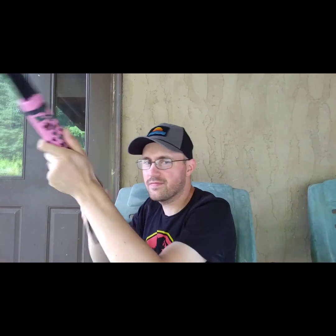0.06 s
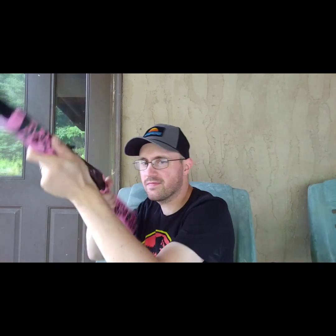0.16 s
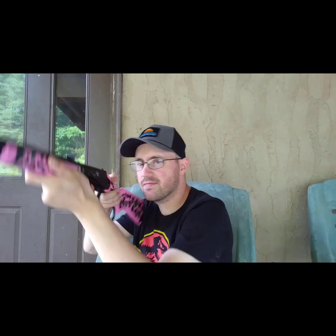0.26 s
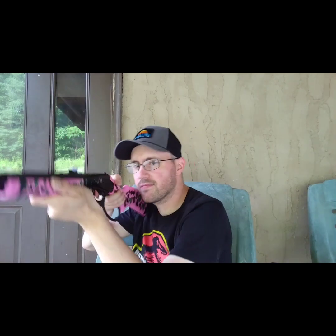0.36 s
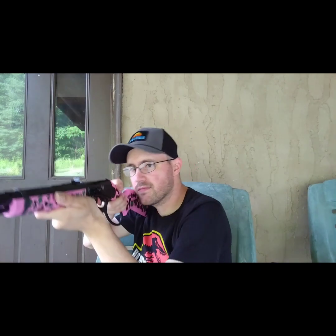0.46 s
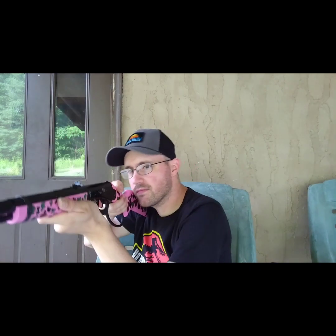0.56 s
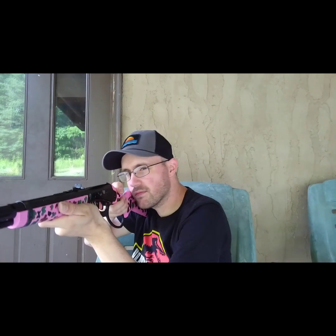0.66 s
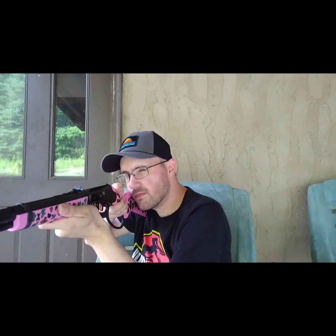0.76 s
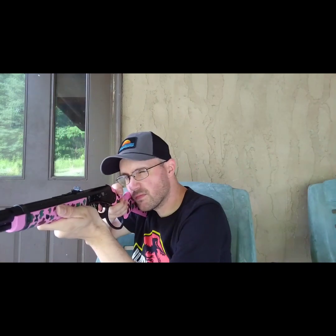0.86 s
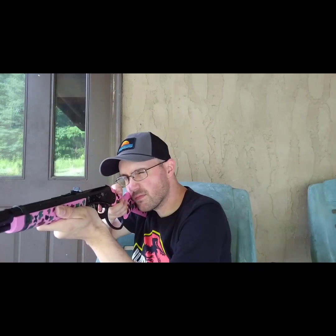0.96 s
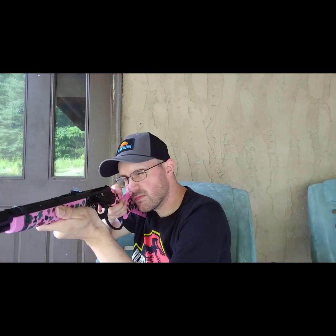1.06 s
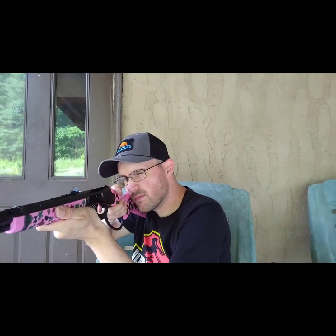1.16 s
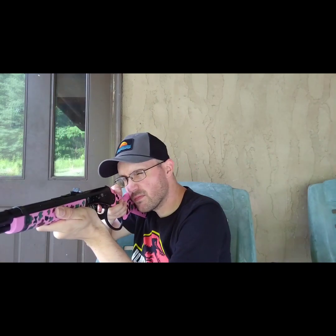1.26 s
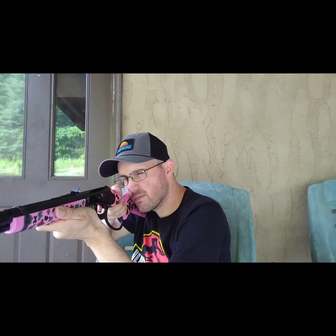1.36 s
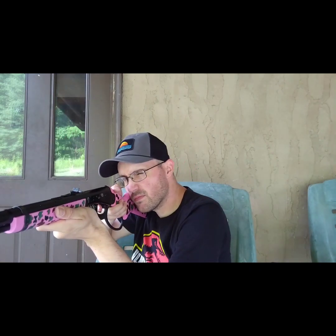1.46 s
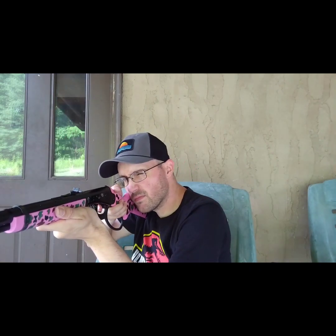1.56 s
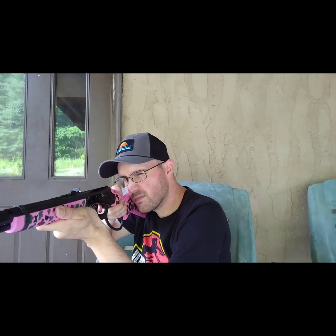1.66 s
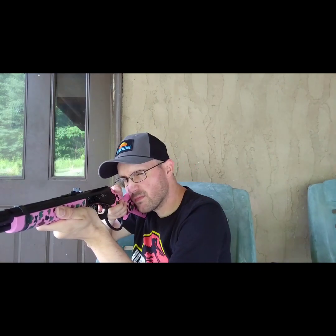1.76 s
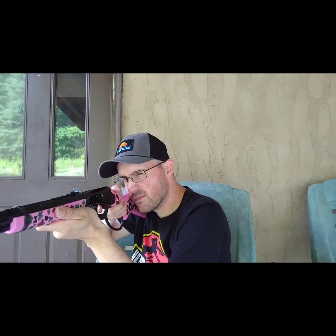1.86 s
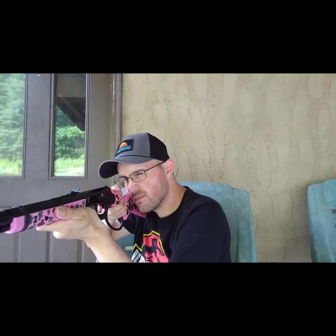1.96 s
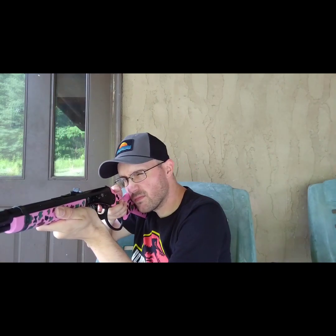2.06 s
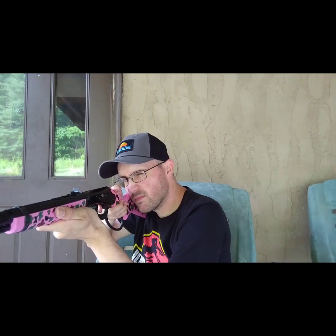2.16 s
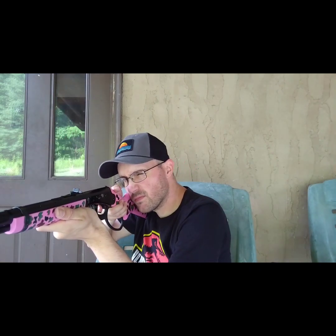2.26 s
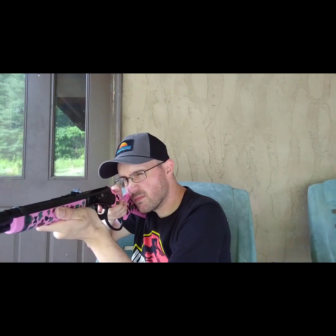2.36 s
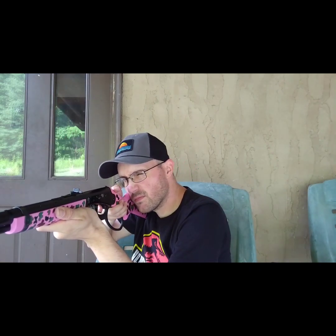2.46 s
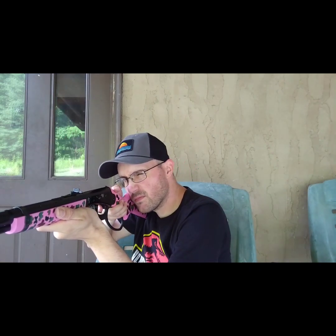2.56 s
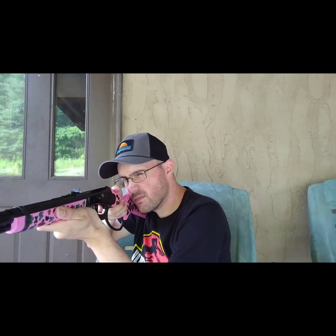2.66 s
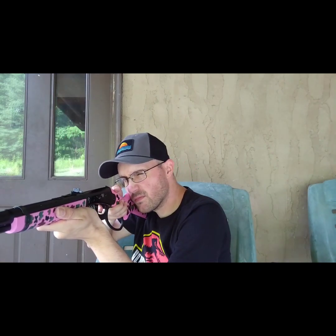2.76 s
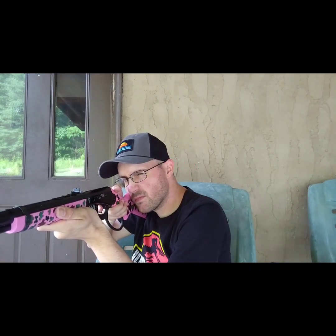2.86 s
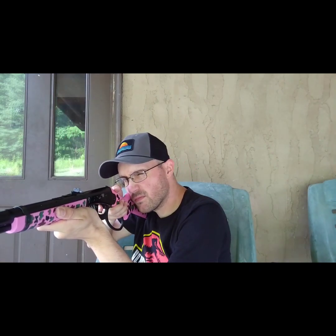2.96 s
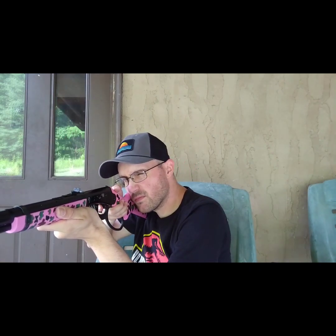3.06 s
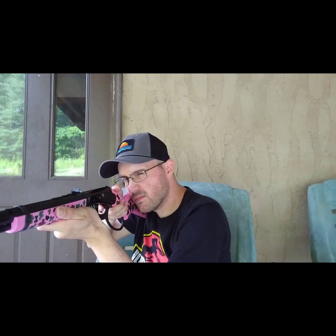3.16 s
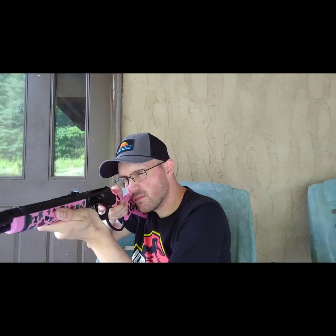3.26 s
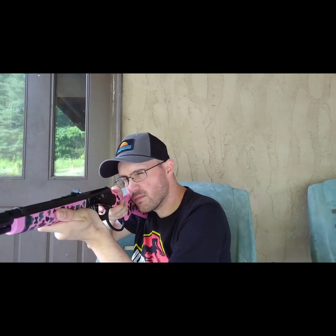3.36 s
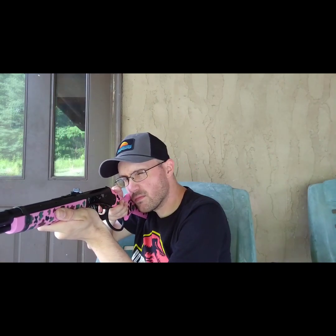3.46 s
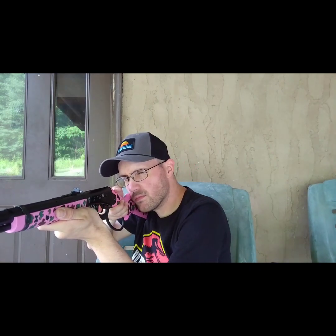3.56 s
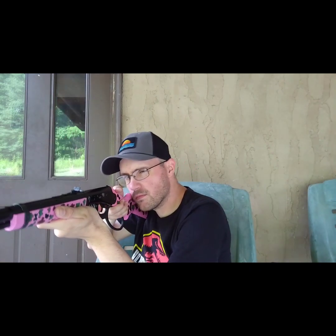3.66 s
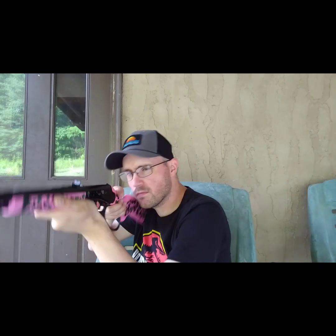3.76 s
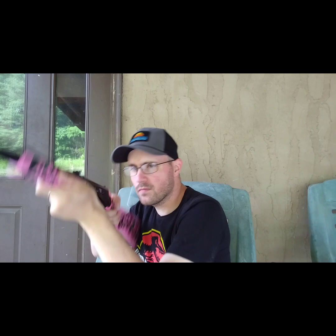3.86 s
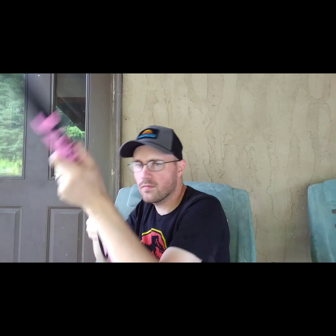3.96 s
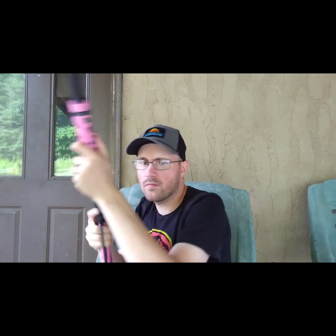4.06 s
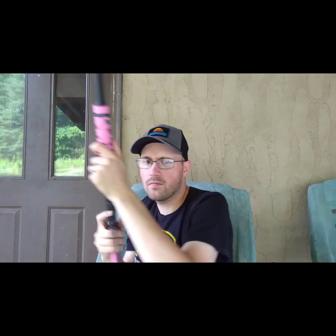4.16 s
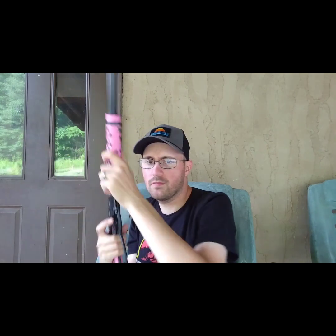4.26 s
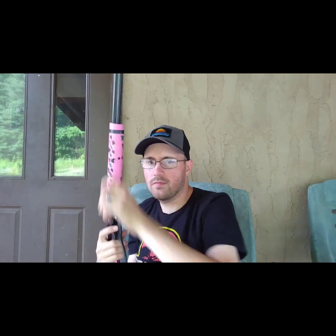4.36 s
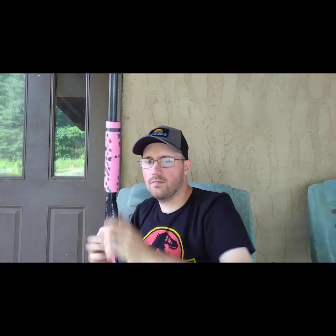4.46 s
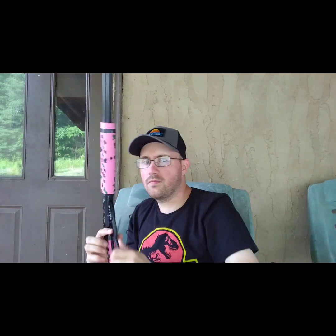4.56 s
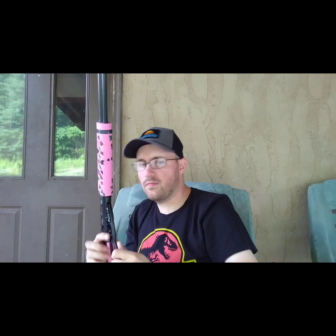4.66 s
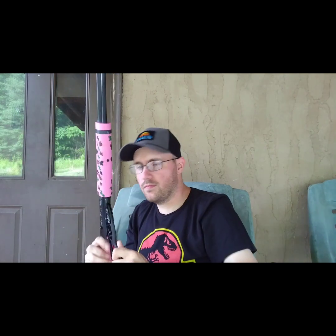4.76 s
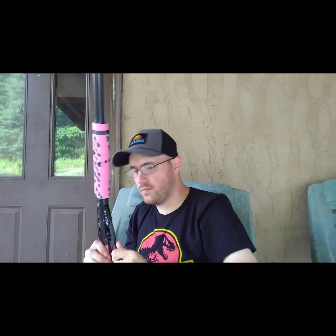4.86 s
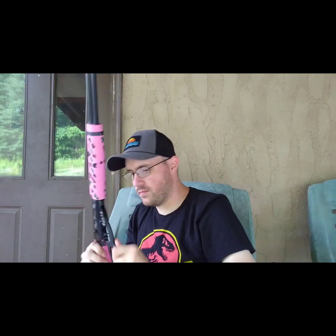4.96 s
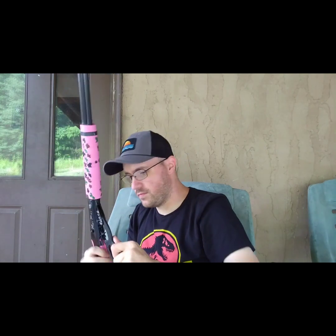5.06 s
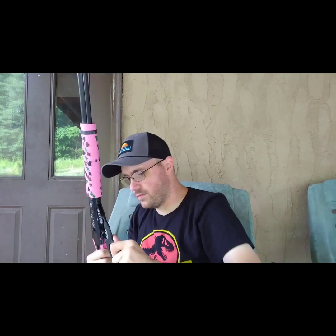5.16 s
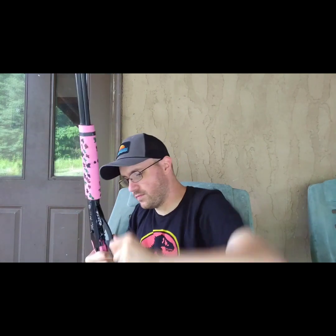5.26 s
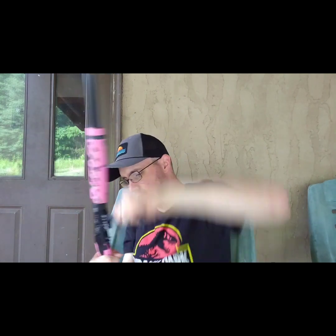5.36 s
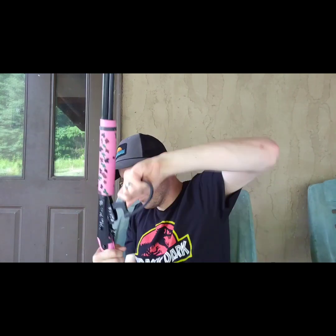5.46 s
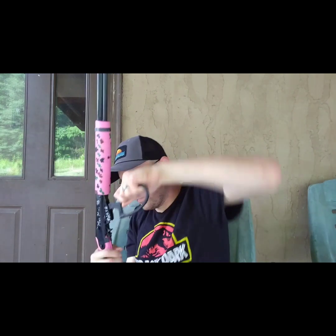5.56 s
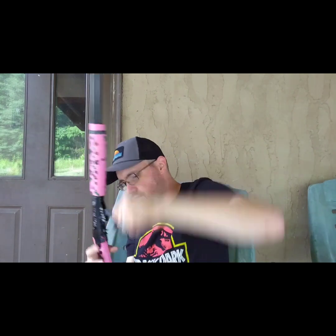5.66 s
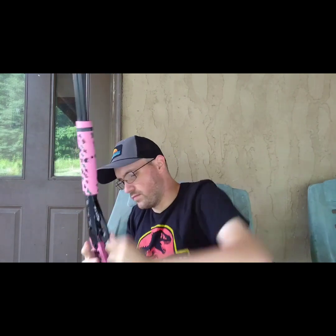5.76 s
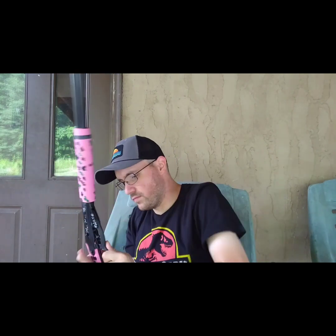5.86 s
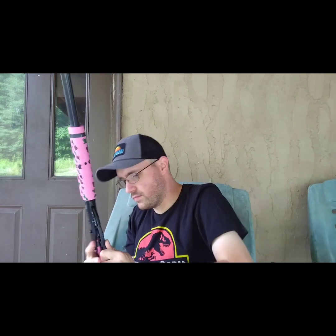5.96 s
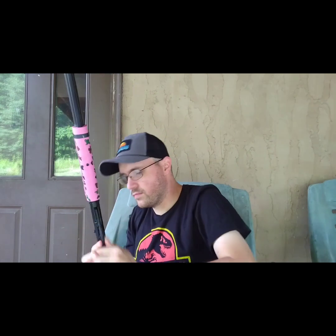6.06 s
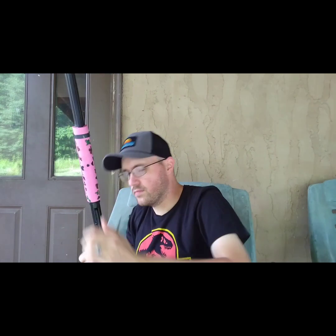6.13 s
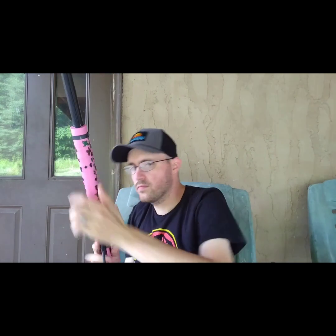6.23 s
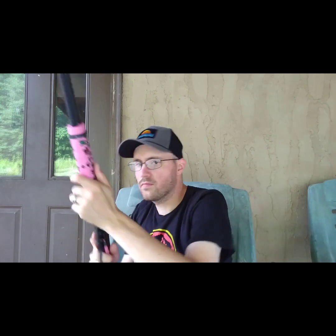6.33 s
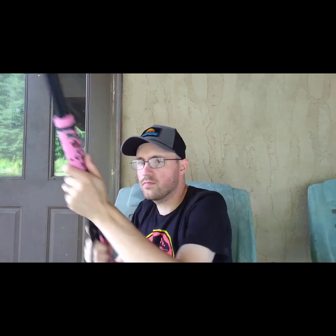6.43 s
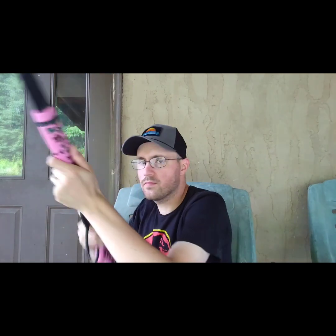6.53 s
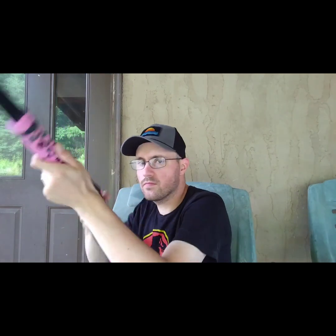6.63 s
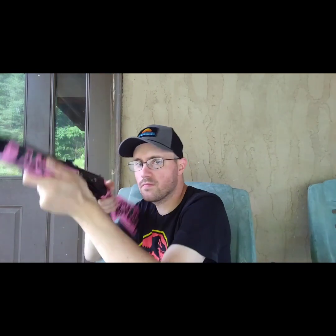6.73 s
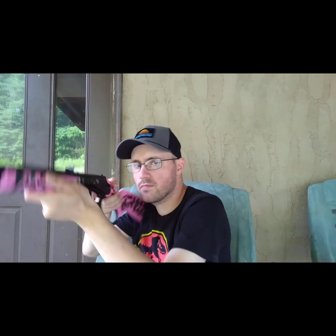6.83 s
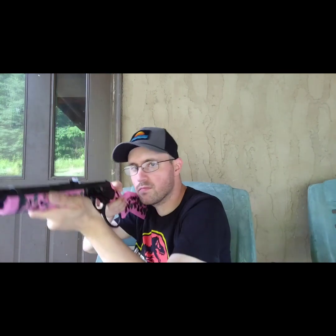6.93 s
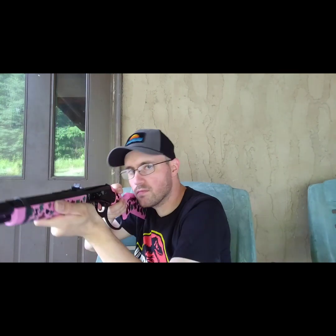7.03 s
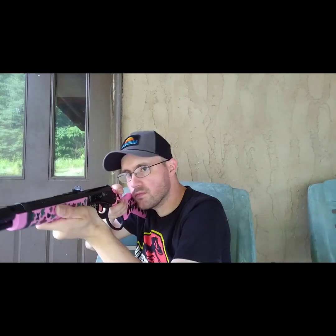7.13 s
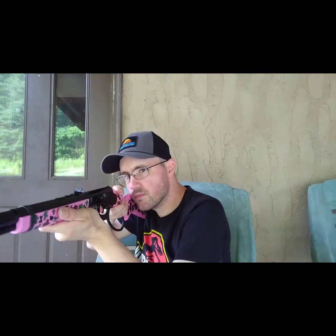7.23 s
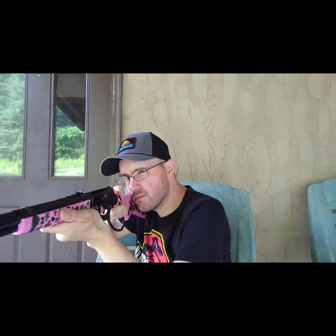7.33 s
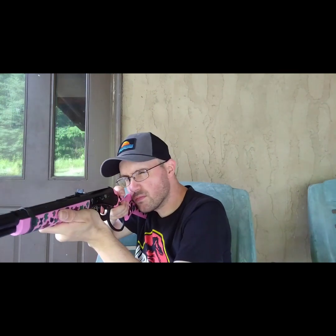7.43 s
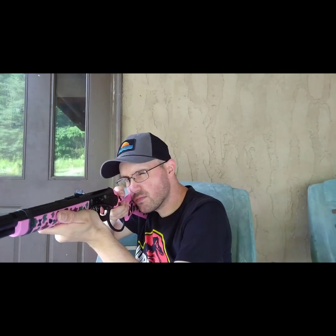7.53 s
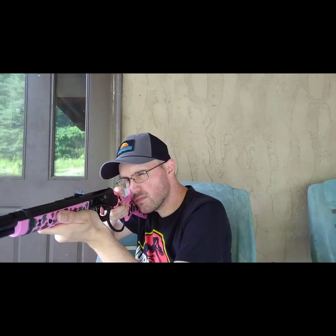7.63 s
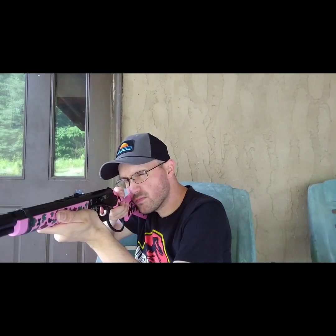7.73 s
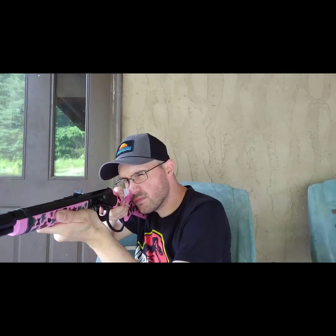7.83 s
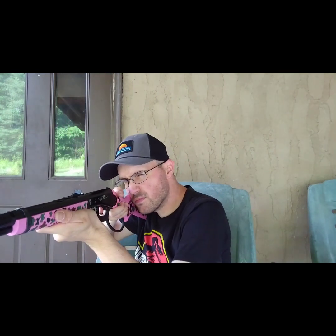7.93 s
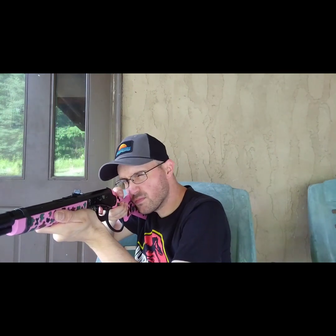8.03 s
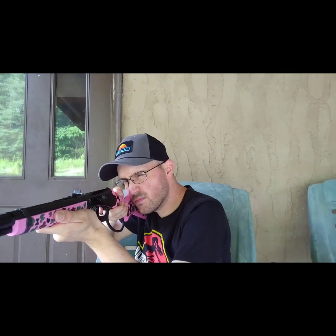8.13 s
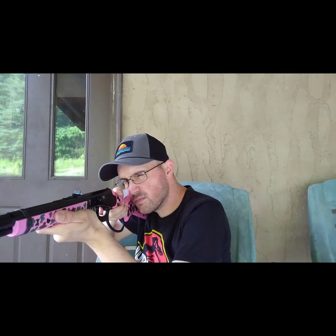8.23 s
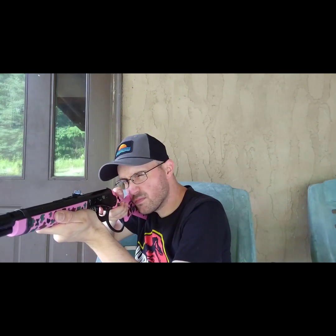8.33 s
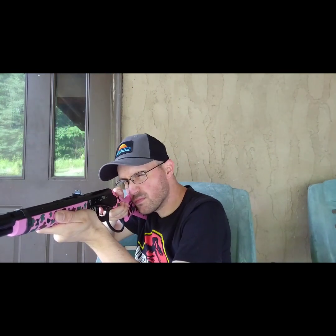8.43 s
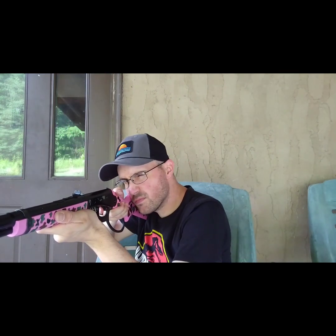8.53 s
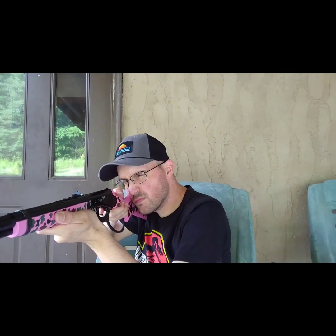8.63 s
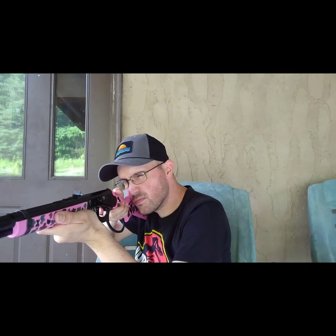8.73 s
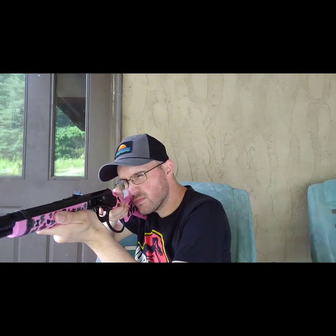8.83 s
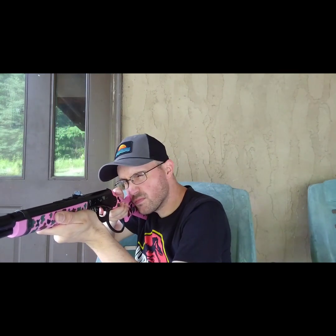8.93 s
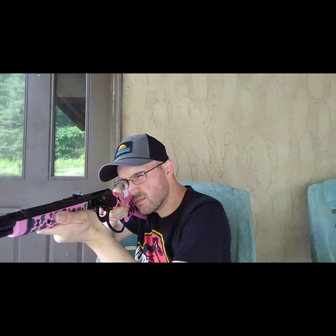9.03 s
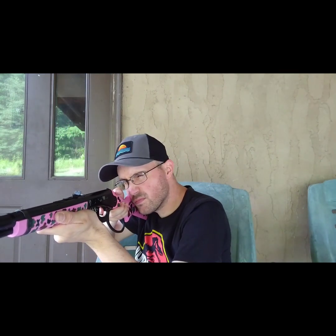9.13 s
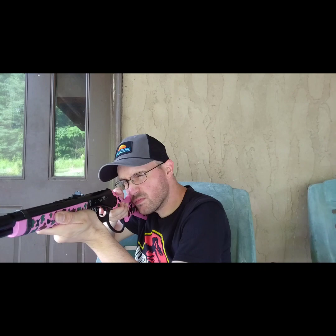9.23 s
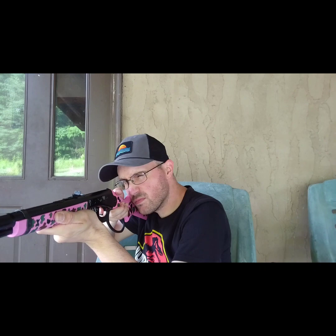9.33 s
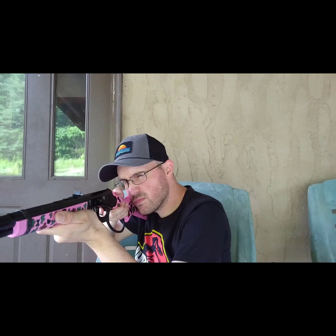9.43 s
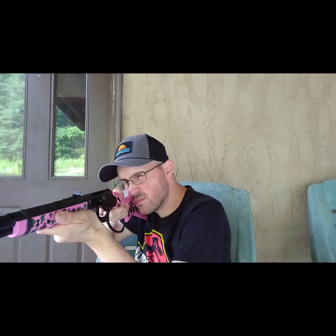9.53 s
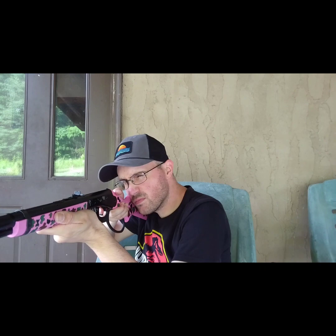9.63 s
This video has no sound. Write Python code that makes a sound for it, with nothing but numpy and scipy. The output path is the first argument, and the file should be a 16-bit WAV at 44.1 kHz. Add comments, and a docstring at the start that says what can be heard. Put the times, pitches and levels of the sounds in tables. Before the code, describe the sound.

Pellets trickle inside an air rifle, one hard snapping shot pings a metal target, then the lever ratchets and latches while a wren sings.

```python
"""A lever-action air rifle is aimed, fired, cocked and aimed again, heard from a covered porch.
Its shot is a noise burst with ringing modes; the lever is grating grains, ratchet clicks and latch snaps.
Steel pellets hiss and tumble along its magazine as dense random collisions ringing in a tube.
A metal target pings as decaying sines; a wren in the trees sings gliding whistles, with echoes.
Filtered noise makes the open-air hush, a far low rumble and a thin insect drone."""
import sys
import numpy as np
from scipy import signal
from scipy.fft import rfft, irfft
from scipy.io import wavfile

SR = 44100
rng = np.random.default_rng(int(sys.argv[2]) if len(sys.argv) > 2 else 0)


def transcribe(signal):
    """Save signal, clipped to [-1, 1], as a 16-bit WAV file at the path in sys.argv[1]."""
    frames = np.atleast_2d(signal).T
    limited = np.clip(frames, -1, 1)
    pcm = np.round(limited * 32767).astype(np.int16)
    wavfile.write(sys.argv[1], SR, pcm)


N = 427329
TIME = np.arange(N) / SR

# colour of pellets against the magazine tube: (frequency [Hz], level [dB])
MAGAZINE_COLOUR = [(300, -28), (800, -21.5), (1400, -5.5), (2000, -2.5), (2800, -1), (3400, -2),
                   (4100, 2.5), (4600, 1.5), (5200, -3.5), (5800, -2.5), (6300, -5.5), (7200, -0.5),
                   (8000, -6.5)]
# colour of knocks and clicks on the gun's body: (frequency [Hz], level [dB])
RECEIVER_COLOUR = [(50, -33.5), (180, -19), (320, -10.5), (500, -8.5), (700, -5), (1000, -8), (1400, -2),
                   (2100, 0), (2700, 4), (3100, -1.5), (3800, 3), (4700, -4), (6000, -2.5), (7500, -4.5)]
# the latch touching, then snapping shut: (time [s], level [dB], ring [Hz])
LATCH_CLICKS = [(5.861, -50, 4500), (5.8654, -34.5, 3900), (5.8789, -22.5, 1950), (5.8806, -19.5, 5000),
                (5.8819, -17.5, 4800)]

SLAM_S = 3.2799  # the piston hits the end of its chamber
BURST_RISE_DB_PER_S, BURST_FALL_DB_PER_S = 9000, 3200


def shot():
    """The sear lets go; the spring drives the piston until it slams, shudders and leaves parts buzzing."""
    # colour of the air chamber: (frequency [Hz], level [dB])
    chamber_colour = [(20, -41), (50, -17), (110, 4.5), (240, -6.5), (400, -1.5), (750, -8), (1300, -4),
                      (1750, 1.5), (2600, 4), (3600, -1.5), (4700, 2), (5700, -6), (7400, -7.5)]
    # short modes of the slam: (frequency [Hz], level [dB], t60 [s])
    slam_modes = [(113, -24.5, 0.027), (455, -20, 0.019), (1000, -23, 0.013), (1950, -13, 0.005),
                  (2550, -4.5, .006), (3150, -13.5, .005), (5800, -17.5, 0.0027)]
    release = swell(3.272, -19, 0.002, BURST_RISE_DB_PER_S, BURST_FALL_DB_PER_S)
    slam = swell(SLAM_S, -14, 0, BURST_FALL_DB_PER_S, BURST_FALL_DB_PER_S)
    shudder = swell(SLAM_S, -25, 0.02, BURST_RISE_DB_PER_S, fall_db_per_s=250)
    buzz = swell(SLAM_S, -38.5, 0, BURST_RISE_DB_PER_S, fall_db_per_s=68)

    burst_noise = rms_one(colour(grains(per_s=5000, spread_db=4.0), chamber_colour))
    buzz_noise = rms_one(colour(grains(per_s=700, spread_db=4.5), chamber_colour))
    out = together(release, slam, shudder) * burst_noise + buzz * buzz_noise
    add(out, SLAM_S, struck(slam_modes))
    return out


def spring():
    """Spring and barrel hum on after the slam as decaying sines, fading in over 5.4 ms."""
    # modes of spring and barrel: (frequency [Hz], level [dB], t60 [s])
    hum_modes = [(89, -43, .4), (143.6, -33, .62), (205, -38, 0.37), (282, -46, 0.39), (373, -31.5, .52),
                 (806, -38.5, 0.12), (980, -35, 0.25), (1066, -38.5, 0.25), (1640, -33.5, 0.22),
                 (1730, -29.5, .17), (1916, -34, 0.2), (2050, -33, 0.19), (2203, -35, .22),
                 (2330, -35, 0.17), (2470, -33, .2), (2630, -30.5, .22), (2800, -31, 0.17),
                 (3370, -38, .23), (3700, -35, .22), (4418, -37.5, .2)]
    out = np.zeros(N)
    add(out, SLAM_S, struck(hum_modes) * np.clip(TIME[:SR] / 0.0054, 0, 1))
    return out


def lever():
    """The lever grates, the pawl clicks tooth by tooth, the lever swings back and the latch snaps shut."""
    # the pawl dropping over the ratchet teeth: (time [s], level [dB])
    teeth = [(5.370, -32.5), (5.3864, -25.5), (5.4015, -27), (5.417, -23.5), (5.435, -25), (5.439, -24),
             (5.476, -22.5)]
    first, last = teeth[0][0], teeth[-1][0]
    grate = swell(first, -37, last - first + 0.014, rise_db_per_s=2200, fall_db_per_s=700)
    grate *= amp(np.interp(TIME, [first, first + 0.035], [-5, 0]))  # eases in
    swing_back = swell(5.62, -52, 0, rise_db_per_s=120, fall_db_per_s=100)
    out = grate * rms_one(colour(grains(per_s=1500, spread_db=3), RECEIVER_COLOUR))
    out += swing_back * rms_one(colour(grains(per_s=1300, spread_db=3.5), RECEIVER_COLOUR))

    # the tooth ring sinks and fades as the spring is loaded
    first_hz, last_hz = 3540, 1910
    for s, db in teeth:
        load = (s - first) / (last - first)
        hz = first_hz * (last_hz / first_hz) ** load
        ring_db = 5 - 17 * load
        click = contact(RECEIVER_COLOUR, hz, ring_db, crack_t60=0.017, ring_t60=0.0058)
        add(out, s, amp(db) * click)
    for s, db, hz in LATCH_CLICKS:
        snap = contact(RECEIVER_COLOUR, hz, ring_db=2, crack_t60=0.014, ring_t60=0.005)
        add(out, s, amp(db) * snap)
    return amp(0.5) * tube(out, share_db=-11)  # lever level


def pellets():
    """Each tilt starts an avalanche that thins to a trickle; pellets hiss like a rain stick and tumble."""
    # the muzzle is lowered and the pellets slide forward: (time [s], avalanche length [s],
    # avalanche level [dB], trickle length [s], trickle level [dB], sag halfway [dB])
    tilts = [(0.295, .15, -54.5, 2.026, -57.5, .5), (6.854, 0.11, -51, 2.683, -57, 4)]
    # clumps breaking loose within the trickle: (time [s], level [dB])
    clump_times = [(0.85, -59), (1.05, -60), (1.14, -55), (1.32, -56.5), (7.06, -57), (7.22, -55.5),
                   (7.34, -52.5), (7.54, -56.5), (7.65, -59.5)]
    # small clicks: (time [s], level [dB], ring [Hz])
    small_clicks = [(0.225, -47.5, 2420), (0.257, -44.5, 2650), (0.292, -42.5, 3230), (0.463, -40, 3330),
                    (0.497, -42.5, 2950), (0.723, -44.5, 3500), (0.862, -42.5, 2490), (1.636, -42, 3630),
                    (1.703, -43, 2400), (2.457, -55.5, 5740), (3.599, -46.5, 4800), (3.627, -50.5, 4500),
                    (3.676, -47.5, 4200), (6.885, -38, 2700), (6.977, -40, 2080), (7.056, -40.5, 4500),
                    (8.444, -46.5, 4000), (8.475, -47, 4400)]
    avalanche, trickle = 0, 0
    for s, avalanche_s, avalanche_db, trickle_s, trickle_db, sag_db in tilts:
        progress = np.clip((TIME - s) / trickle_s, 0, 1)
        sag = sag_db * np.sin(np.pi * progress) ** 2
        avalanche += swell(s, avalanche_db, avalanche_s, rise_db_per_s=229, fall_db_per_s=170)
        trickle += swell(s, trickle_db - sag, trickle_s, rise_db_per_s=260, fall_db_per_s=118)
    clumps = sum(swell(s, db, 0, rise_db_per_s=330, fall_db_per_s=190) for s, db in clump_times)

    # the tumbling moves in fits and starts
    surge = amp(2.0 * rms_one(band(rng.standard_normal(N), 9.4, 45)))
    hiss = rms_one(tube(colour(grains(per_s=6000, spread_db=5), MAGAZINE_COLOUR), share_db=-7.0))
    knocking = band(grains(per_s=520, spread_db=5.0), 1420, 4250)
    tumble = surge * rms_one(tube(knocking, share_db=-5.5))
    # an avalanche mostly tumbles, a trickle mostly hisses
    out = hiss * together(trickle, amp(-2.2) * avalanche, clumps)
    out += tumble * together(amp(-8) * trickle, avalanche, amp(-4.5) * clumps)
    for s, db, hz in small_clicks:
        click = contact(MAGAZINE_COLOUR, hz, ring_db=-6.5, crack_t60=0.017, ring_t60=0.01)
        add(out, s, amp(db) * click)
    return out


def pour():
    """The pellets slide back down the raised gun and land in a heap; the closing latch jolts them again."""
    # colour of pellets landing together: (frequency [Hz], level [dB])
    heap_colour = [(300, -24.5), (700, -17.5), (1100, -6), (1400, -3), (1700, -4), (2300, 2), (2900, 2),
                   (3300, 3), (3900, 2), (4300, 4), (4800, -3), (6300, -3), (7000, 0), (8000, -3)]
    slide_s, heap_s = 4.24, 4.332
    heap_fall_db_per_s = 480
    slide = swell(slide_s, -51, heap_s - slide_s, 330, heap_fall_db_per_s)
    heap = (TIME > heap_s) * swell(heap_s + 0.04, -29, 0.022, 250, heap_fall_db_per_s)
    jolt = swell(LATCH_CLICKS[-1][0] + 0.0056, -30, 0, BURST_RISE_DB_PER_S, fall_db_per_s=350)
    sliding = rms_one(tube(colour(grains(per_s=2400, spread_db=3.5), MAGAZINE_COLOUR), share_db=-4))
    landing = rms_one(colour(grains(per_s=2400, spread_db=2.0), heap_colour))
    return slide * sliding + together(heap, jolt) * landing


def handling():
    """Hands knock on the gun with little tube ring, the stock creaks in the grip; a faint soft rustle."""
    # hands on stock and lever: (time [s], level [dB], ring [Hz])
    hand_knocks = [(4.205, -54, 2210), (4.245, -47, 1500), (4.773, -55.5, 2200), (4.811, -62, 3180),
                   (5.034, -51, 1450), (5.055, -48, 1220), (5.321, -57.5, 1050), (5.549, -37.5, 1400),
                   (6.306, -54.5, 2100), (6.421, -60, 4400)]
    knocks = np.zeros(N)
    for s, db, hz in hand_knocks:
        knock = contact(RECEIVER_COLOUR, hz, ring_db=10.5, crack_t60=0.027, ring_t60=0.006)
        add(knocks, s, amp(db) * knock)
    creak = swell(6.345, -69.5, 0.065, rise_db_per_s=400, fall_db_per_s=500)
    creak = creak * rms_one(band(grains(per_s=400, spread_db=3), 2050, 2350))
    rustle = swell(6.02, -73, 0.47, rise_db_per_s=99.5, fall_db_per_s=80)
    rustle = rustle * rms_one(band(grains(per_s=1500, spread_db=5), 900, 6000))
    return tube(knocks, share_db=-16) + creak + rustle


def target():
    """The pellet pings the metal target: modes swell over 8.5 ms, then drop abruptly after about 70 ms."""
    # modes before the drop: (frequency [Hz], level [dB], t60 [s])
    plate_modes = [(2970, -34, 0.14), (3600, -36.5, 0.1), (4630, -36.5, 0.28), (4661, -24.5, 0.22),
                   (6200, -42, 0.95), (6861, -46.5, 0.72)]
    hit_s, drop_s = 3.436, 3.505
    out = np.zeros(N)
    add(out, hit_s, struck(plate_modes) * np.interp(TIME[:SR], [0, 0.0085], [0.45, 1]))
    drop_db = 21 * np.clip((TIME - drop_s) / 0.016, 0, 1)
    return out * amp(-drop_db)


def wren(buzz_hz=210, buzz_depth_hz=230, throb=0.6):
    """One phrase of glides and whistles recurs, slightly varied; notes buzz by fluttering pitch and level."""
    # phrases: (time [s], level [dB], crescendo [dB per s])
    phrases = [(-0.2, -56, -4), (2.595, -54, 14), (2.98, -48, 19.5), (3.368, -39.5, -2), (3.759, -44, -10),
               (8.011, -56, 42), (8.393, -46, 9.5), (8.782, -43, -10), (9.173, -45.5, -3)]
    # notes of one phrase: (delay [s], length [s], start [Hz], middle [Hz], end [Hz], level [dB],
    # buzz [0-1], loudest moment [0-1 of the note])
    notes = [(-.022, .028, 4035, 4793, 4800, -16, .2, .5), (-.006, 0.036, 3674, 3654, 3560, -3, .05, 0.5),
             (.018, .032, 3490, 3302, 3300, -4, 0.6, 0.3), (.045, .028, 3970, 4100, 4450, -0.5, .3, .2),
             (.104, .05, 2626, 2735, 2750, 3, 0.01, 0.7), (0.175, .028, 3080, 2950, 2920, 1, 0.4, .15),
             (.22, .058, 2393, 2480, 2430, -6.5, .05, 0.7),
             (0.274, .022, 2392, 2097, 1850, -10.5, 0.8, 0.3)]
    out = np.zeros(N)
    for s, phrase_db, crescendo in phrases:
        for delay, length, start_hz, middle_hz, end_hz, db, buzz, crest in notes:
            u = np.linspace(0, 1, int(length * SR))  # progress through the note
            detune, flutter, effort = rng.standard_normal(3)
            glide = np.polyfit([0, 0.5, 1], [start_hz, middle_hz, end_hz], 2)
            hz = np.polyval(glide, u) * (1 + 0.0084 * detune)
            flutter_hz = buzz_hz * (1 + 0.13 * flutter)
            wobble = buzz * np.sin(2 * np.pi * flutter_hz * TIME[:len(u)])
            hz += buzz_depth_hz * wobble
            rise_fall = np.interp(u, [0, np.clip(crest, 0.05, 0.95), 1], [0, 1, 0])
            shape = (1 + throb * wobble) * np.sin(np.pi / 2 * rise_fall)
            level = amp(phrase_db + crescendo * delay + db + 0.48 * effort)
            if s + delay >= 0:  # the first phrase is already under way
                add(out, s + delay, level * shape * np.sin(2 * np.pi * np.cumsum(hz) / SR))
    return out


def echoes(x, t60_table, gap_s, late_db, early_s=0.039, count=9):
    """Dense reflections after a short gap die band by band; later reflections are weaker."""
    edges = np.geomspace(40, 10000, count)
    tail = 0
    for low, high in zip(edges, edges[1:]):
        t60 = at_hz(t60_table, np.sqrt(low * high))
        tail = tail + band(rng.standard_normal(SR), low, high) * dying(t60, SR)
    onset = np.clip(TIME[:SR] / gap_s - 1, 0, 1)
    late_drop = amp(late_db * np.clip((TIME[:SR] - early_s) / 0.011, 0, 1))
    return signal.fftconvolve(x, rms_one(tail * onset * late_drop) / np.sqrt(SR))[:N]


def background():
    """Open-air hush, a far rumble and a thin insect drone, each a band or colour of noise."""
    # colour of the open air: (frequency [Hz], level [dB])
    air_colour = [(15, -42.5), (25, -18.5), (82, -1.5), (216, -10.5), (296, -13), (481, -18), (675, -16.5),
                  (882, -18), (972, -17.5), (1330, -20.5), (2220, -20), (2500, -19.5), (5840, -31.5),
                  (7440, -30.5), (8200, -44), (10700, -84.5), (18000, -120)]
    # far rumble: (time [s], level [dB])
    rumble_level = [(0, -71), (1.6, -64), (2.6, -70.5), (4.2, -70), (5.6, -72.5), (6.3, -80.5),
                    (8.6, -73.5), (9.69, -78)]
    hush = amp(-68) * rms_one(colour(rng.standard_normal(N), air_colour))
    rumble_gain = amp(np.interp(TIME, *np.transpose(rumble_level)))
    rumble = rumble_gain * rms_one(band(rng.standard_normal(N), 78, 98))
    insects = amp(-87) * rms_one(band(rng.standard_normal(N), 5680, 5890))
    return hush + rumble + insects


def contact(spectrum, hz, ring_db, crack_t60, ring_t60, size=2048):
    """A crack that excites one broad resonance, carrying the energy of 2 ms at unit rms."""
    crack = colour(rng.standard_normal(size) * dying(crack_t60, size), spectrum)
    resonance = np.cos(2 * np.pi * hz * TIME[:size]) * dying(ring_t60, size)
    ring = signal.fftconvolve(crack, resonance)[:size]
    both = rms_one(crack) + amp(ring_db) * rms_one(ring)
    return rms_one(both) * np.sqrt(0.002 * SR / size)


def tube(x, share_db=0):
    """The steel tube rings on after each contact."""
    # resonances before the share is applied: (frequency [Hz], level [dB], t60 [s])
    tube_modes = [(1464, -36.5, 0.053), (1736, -32, 0.025), (2030, -57.5, .04), (2460, -47.5, .04),
                  (2780, -48, .04), (3967, -45, 0.022), (4630, -51, .025), (7250, -49, 0.0066)]
    return x + amp(share_db) * signal.fftconvolve(x, struck(tube_modes)[:SR // 10])[:N]


def grains(per_s, spread_db):
    """Random tiny collisions of uneven strength and either sign; rms 1."""
    strength = amp(spread_db * np.clip(rng.standard_normal(N), -2, 2))
    signed = strength * rng.choice([-1, 1], N)
    return rms_one(signed * (rng.random(N) < per_s / SR))


def struck(modes):
    """One second of decaying sines."""
    out = 0
    for hz, db, t60 in modes:
        out = out + amp(db) * dying(t60, SR) * np.sin(2 * np.pi * hz * TIME[:SR])
    return out


def dying(t60, size):
    """Decay that loses 60 dB in t60 seconds."""
    return np.exp(-np.log(1000) * TIME[:size] / t60)


def swell(s, db, hold_s, rise_db_per_s, fall_db_per_s):
    """Gain that rises to db at time s, holds, then dies away."""
    before = rise_db_per_s * np.maximum(s - TIME, 0)
    after = fall_db_per_s * np.maximum(TIME - s - hold_s, 0)
    return amp(db - np.minimum(before + after, 200))


def together(*gains):
    """Joint gain of unrelated sounds: their powers add."""
    return np.sqrt(sum(g ** 2 for g in gains))


def colour(x, spectrum, size=4096):
    """Causal (minimum-phase) filter with the given spectrum, built by folding its cepstrum."""
    hz = np.linspace(0, SR / 2, size // 2 + 1)
    cepstrum = irfft(np.log(amp(at_hz(spectrum, hz))))
    cepstrum[1:size // 2] *= 2
    cepstrum[size // 2 + 1:] = 0
    impulse = irfft(np.exp(rfft(cepstrum)))
    return signal.fftconvolve(x, impulse)[:len(x)]


def band(x, low_hz, high_hz):
    """Second-order band-pass."""
    return signal.sosfilt(signal.butter(2, [low_hz, high_hz], "band", fs=SR, output="sos"), x)


def at_hz(points, hz):
    """Read a table on a log-frequency axis."""
    f, value = np.transpose(points)
    return np.interp(np.log(hz + 1), np.log(f), value)


def add(out, s, sound):
    """Mix a sound in at time s."""
    i = round(s * SR)
    out[i:i + len(sound)] += sound[:N - i]


def amp(db):
    """Decibels to gain."""
    return 10 ** (np.asarray(db) / 20)


def rms_one(x):
    """Scale to unit rms."""
    return x / np.sqrt(np.mean(x ** 2) + 1e-20)


def scene():
    """The gun sounds under the porch roof; bird and target echo among the trees."""
    # porch reverberation: (frequency [Hz], t60 [s])
    porch_t60 = [(100, 0.39), (400, 0.41), (1500, .32), (4000, 0.2), (8000, 0.2)]
    trees_t60 = [(2000, 1.0), (6000, 0.6)]  # (frequency [Hz], t60 [s])
    gun = shot() + lever() + pellets() + pour() + handling()
    # high-pass keeps the gun sounds free of deep bass
    gun = signal.sosfilt(signal.butter(4, 85, "high", fs=SR, output="sos"), gun)
    ping, bird = target(), wren()
    porch = amp(-9.5) * echoes(gun, porch_t60, gap_s=0.004, late_db=-4.5, early_s=0.074)
    into_trees = amp(-10.5) * bird + amp(-34.5) * ping
    trees = echoes(into_trees, trees_t60, gap_s=0.004, late_db=-3)
    direct_gun = amp(1) * gun  # gun level
    mix = direct_gun + spring() + porch + bird + ping + trees + background()
    return mix[None]


def record(dry):
    """The microphone signal: overload rounds off the loudest peak, the top is cut steeply at 7.9 kHz."""
    rounded = dry / (1 + (dry / 0.9) ** 4) ** 0.25
    lowpass = signal.firwin(111, 7900, window=("kaiser", 7), fs=SR)
    return signal.fftconvolve(rounded, lowpass[None], "same")


dry = scene()
out = record(dry)
transcribe(out)
```